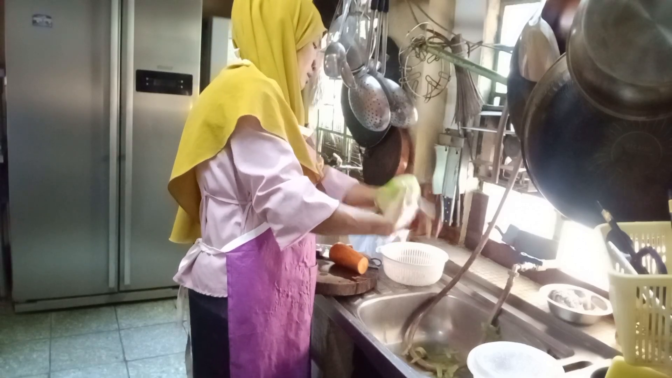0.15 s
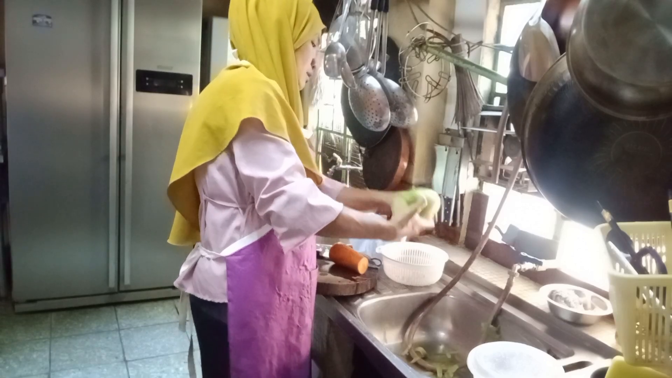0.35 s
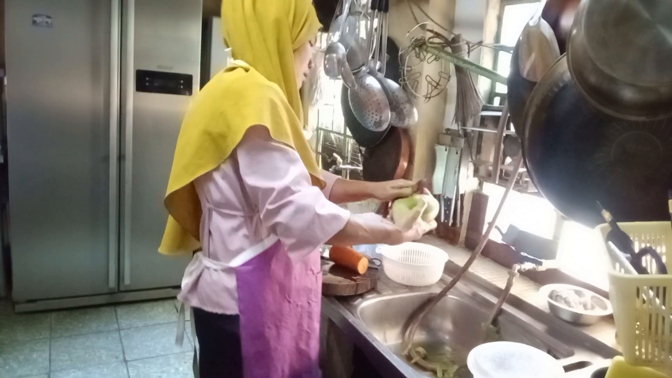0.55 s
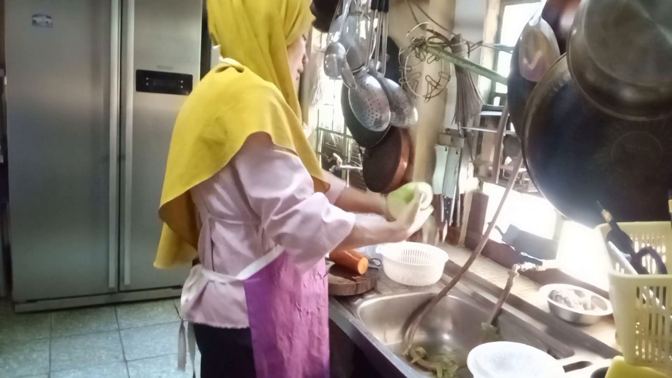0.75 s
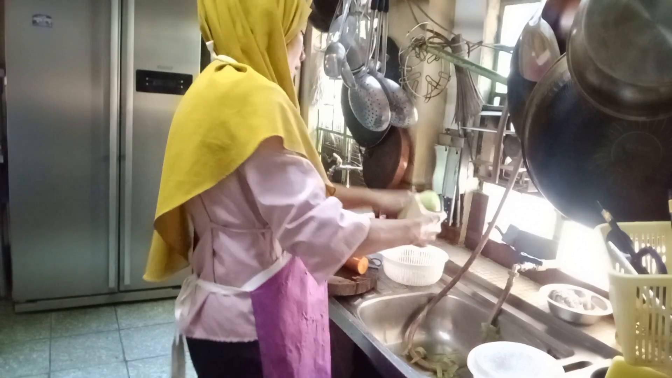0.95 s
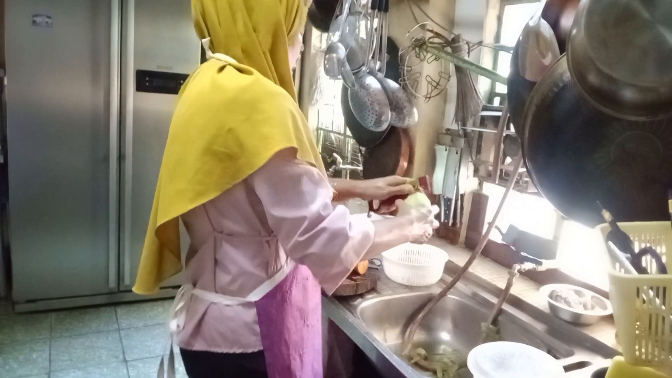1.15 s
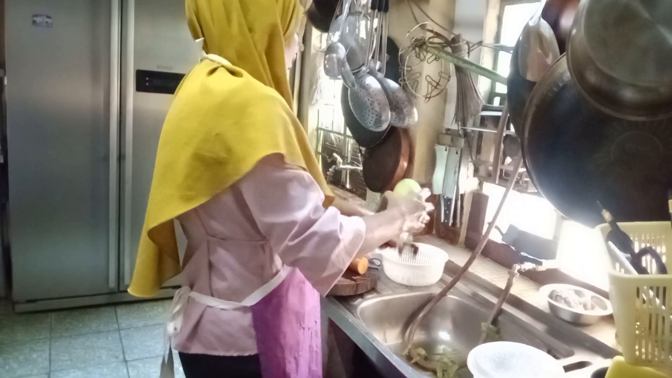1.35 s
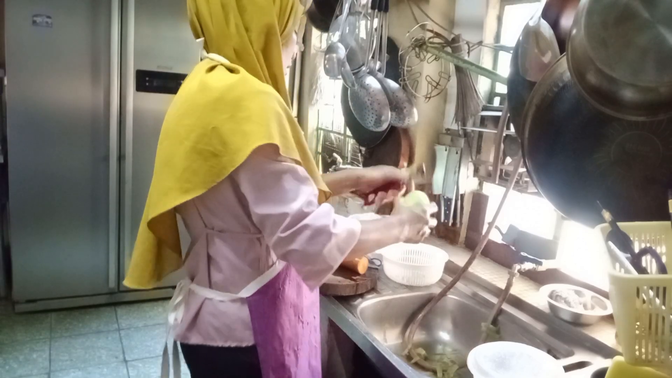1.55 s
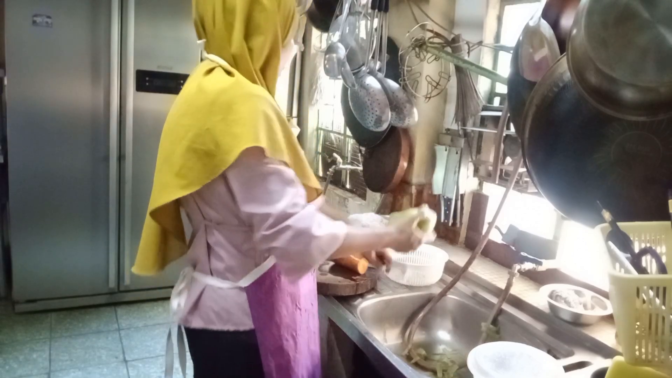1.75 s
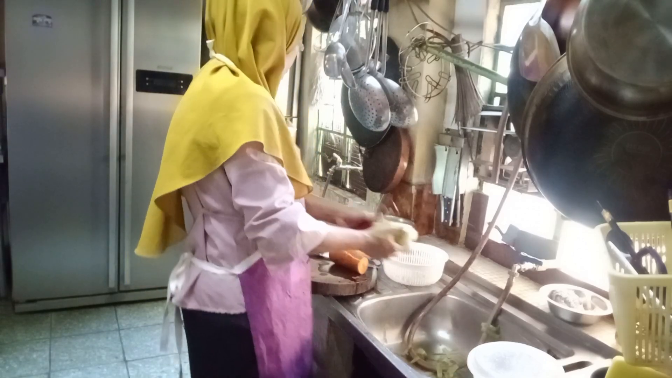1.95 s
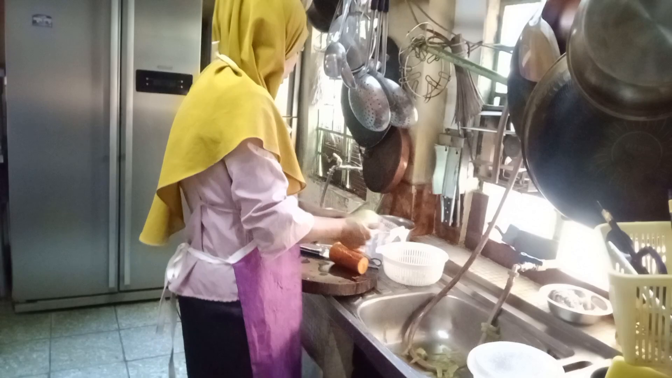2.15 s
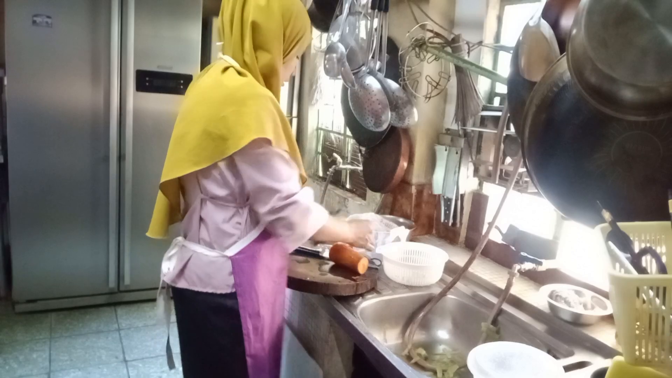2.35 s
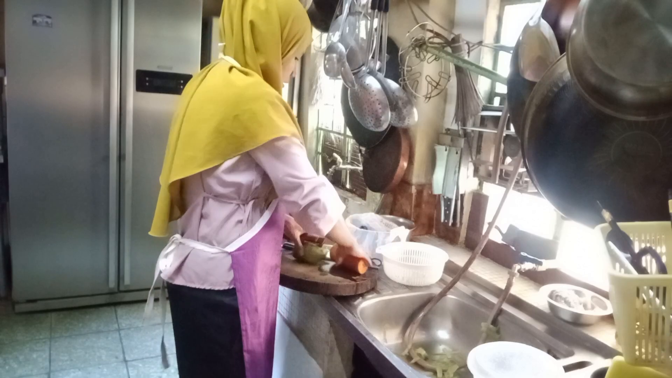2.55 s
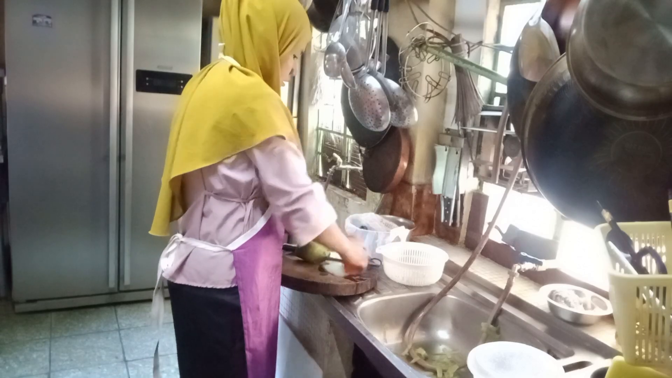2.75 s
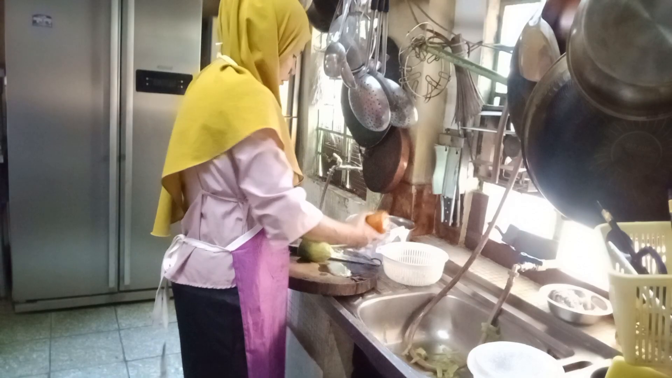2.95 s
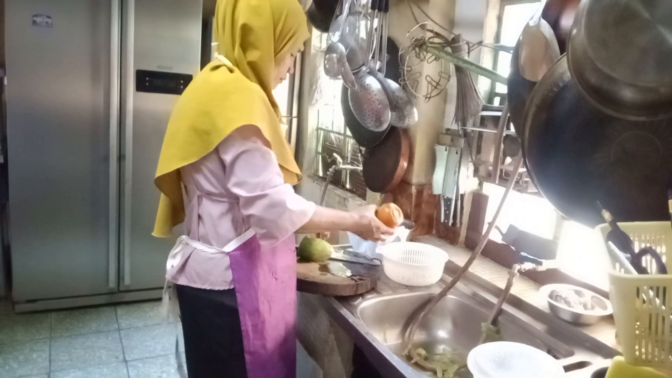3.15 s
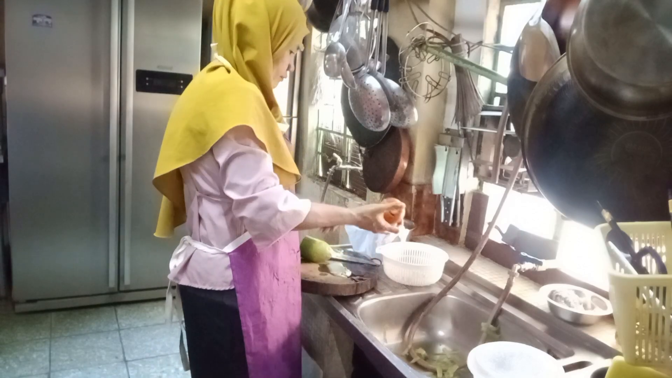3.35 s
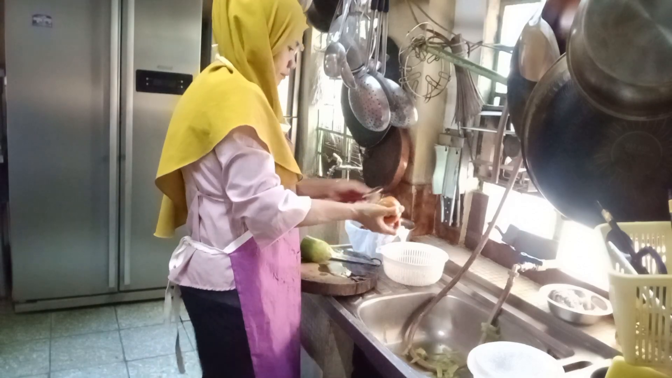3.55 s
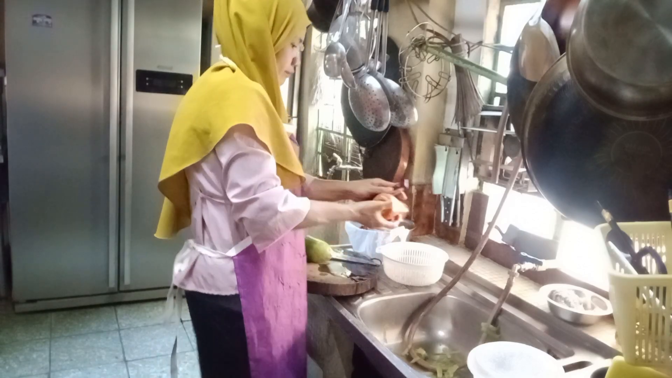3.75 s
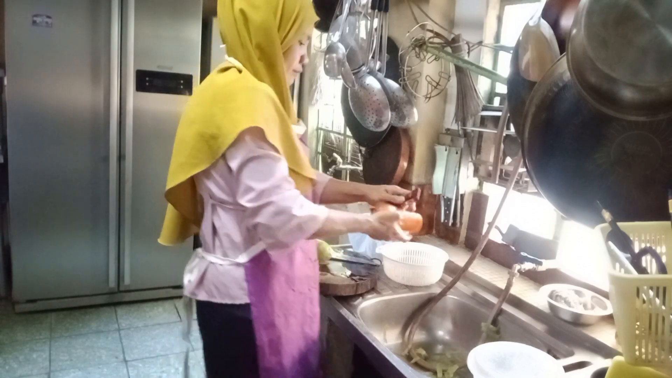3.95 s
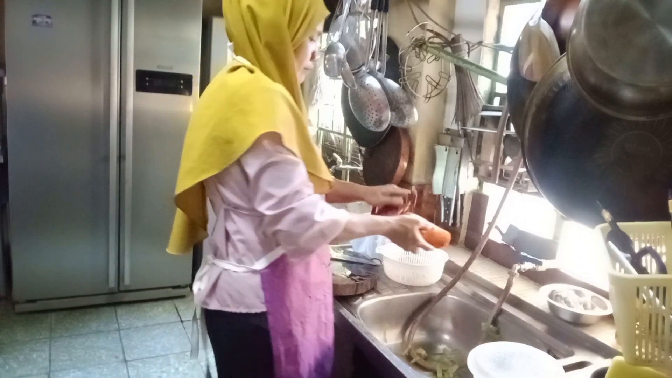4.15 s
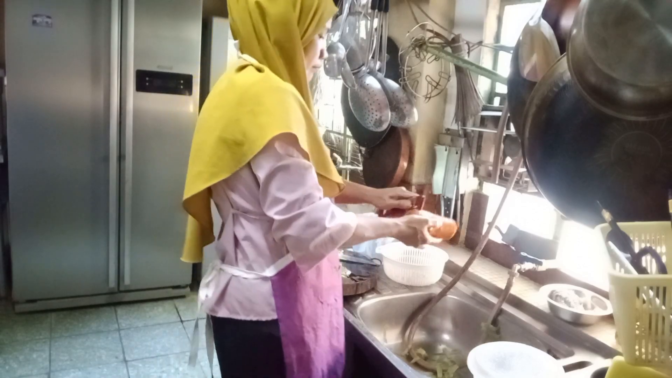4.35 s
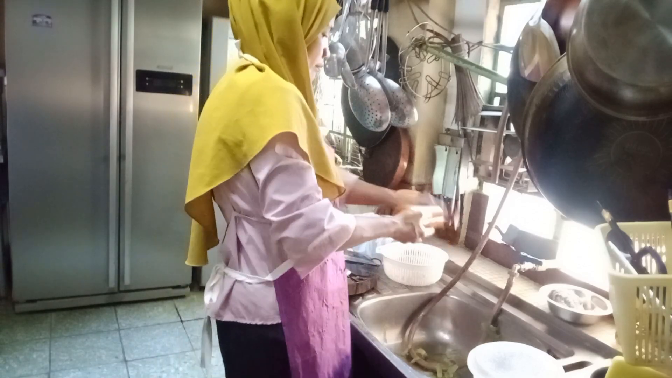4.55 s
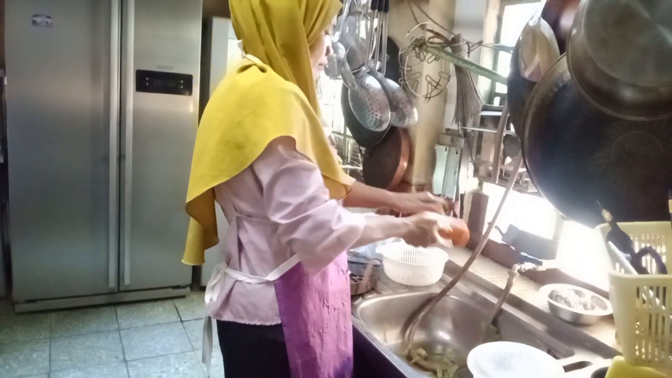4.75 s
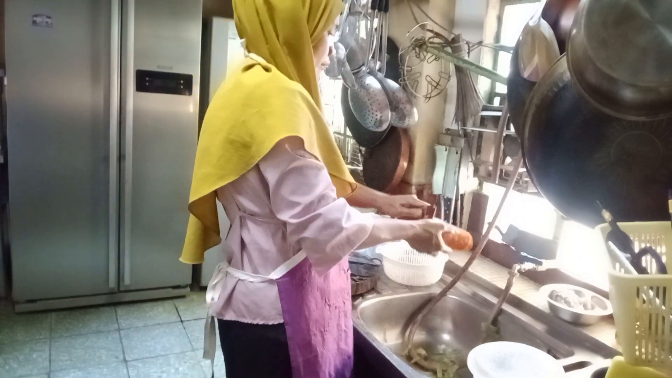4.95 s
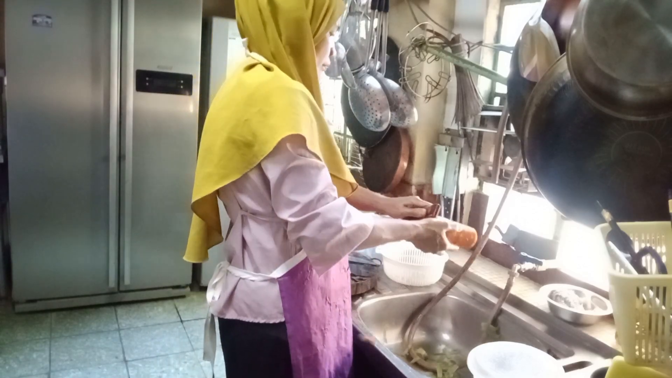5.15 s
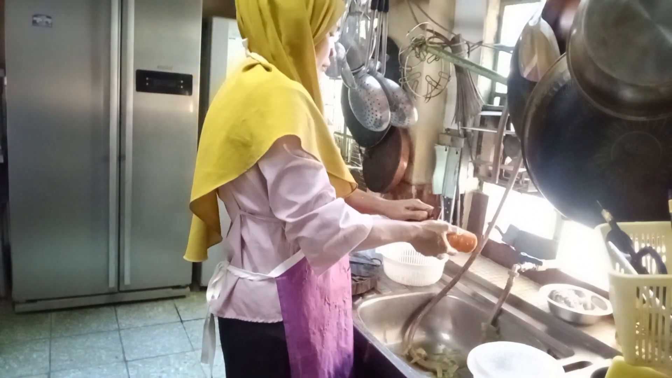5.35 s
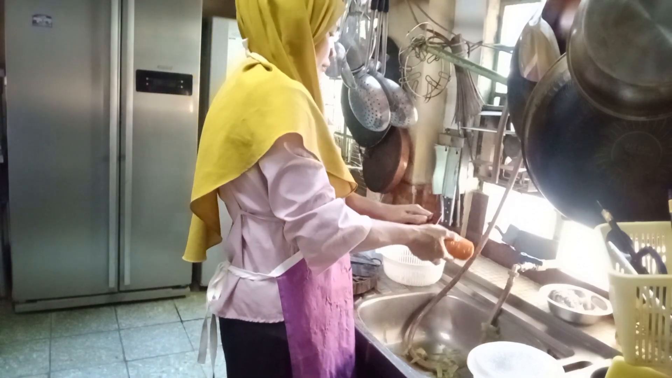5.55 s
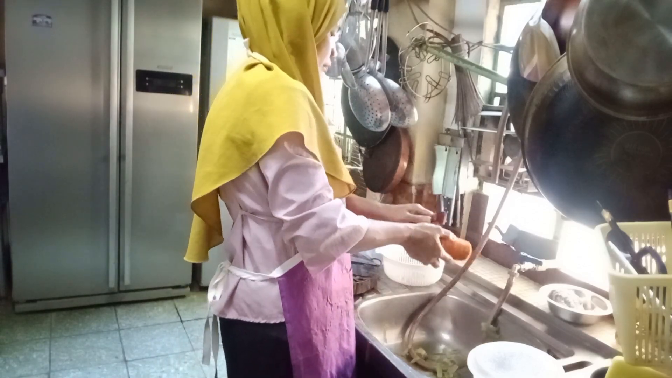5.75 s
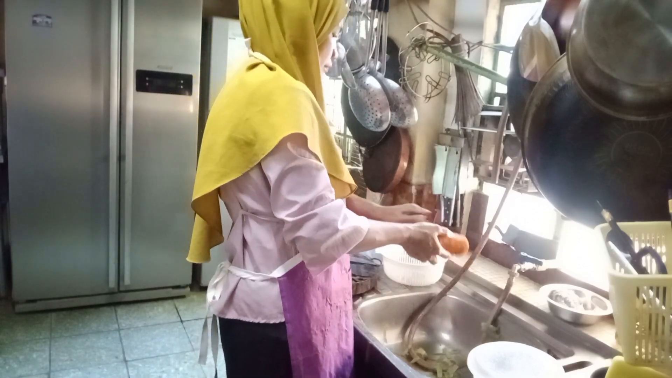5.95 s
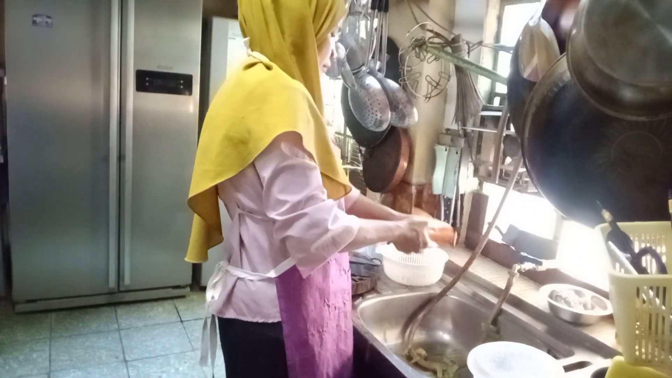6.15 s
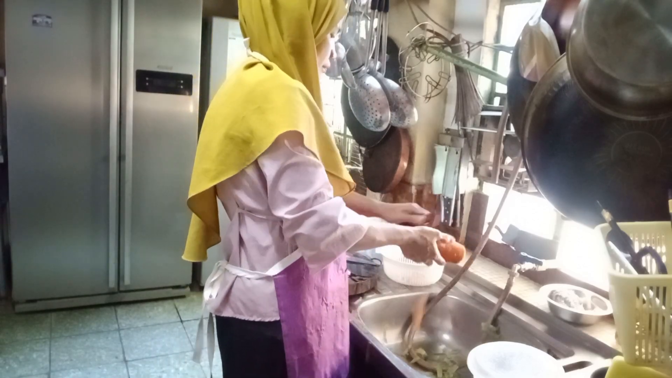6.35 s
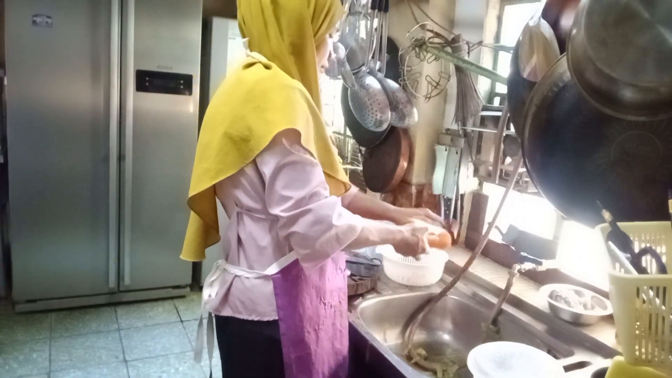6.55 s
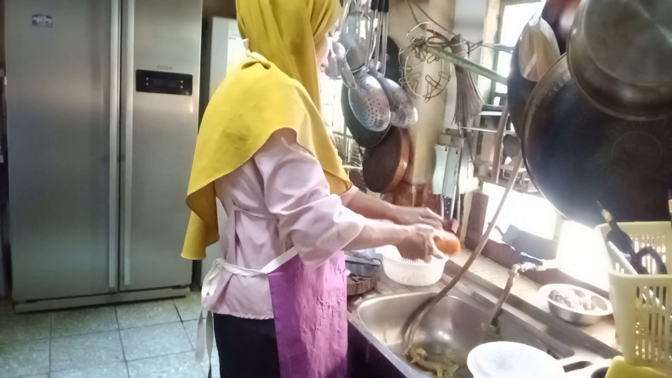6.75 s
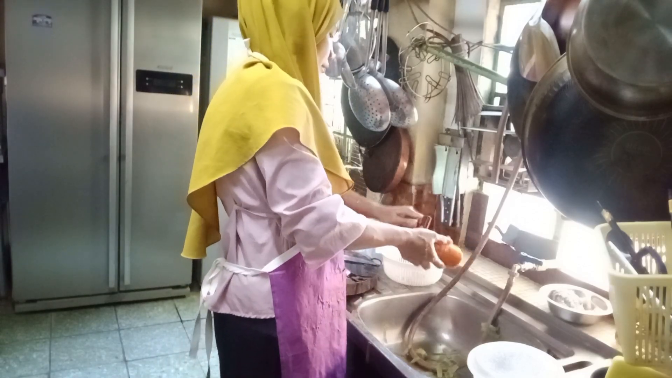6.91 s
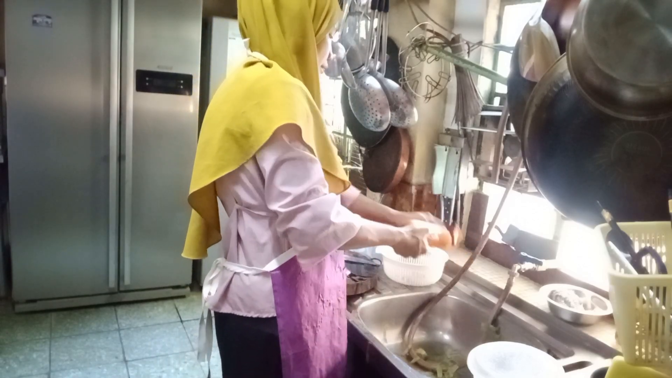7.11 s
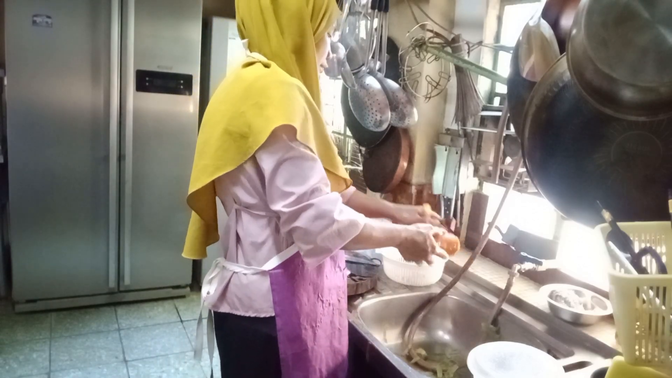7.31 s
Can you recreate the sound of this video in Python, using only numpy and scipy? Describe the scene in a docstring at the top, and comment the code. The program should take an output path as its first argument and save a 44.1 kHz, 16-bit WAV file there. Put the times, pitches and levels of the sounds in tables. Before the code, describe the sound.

A small tiled kitchen, close microphone, short reflections, with low uneven rumble, dull bumps and thin flickering hiss beneath. Gourd peeling comes in short scrapes, each a crisp bite followed by a fibrous slide with a hollow midrange colour: around 0.2-0.3 s, 0.7-0.9, 1.3-1.4, then 1.8-2.0. A tight flurry at 2.1-2.4 s includes the brightest, sharpest rasp near 2.25. At 2.7 s the gourd hits a wooden board: a dull soft push, then a rapid cluster of loud woody knocks and counter clatter, rocking out by about 2.9. From 3 to 4.2 s sleeves rustle faintly over a swelling rumble. Carrot strokes, grainier and crisp, begin lightly at 3.7 and 3.9, then come near 4.4, 4.6-4.75, 5.1, 5.85, 6.0-6.2 in a quick run, a longer one at 6.5-6.7, and 7.1-7.35. Barely audible soft rings mark peelings dropping into the steel sink.

```python
"""In a small tiled kitchen, someone peels a green gourd, drops it on a wooden board and peels a carrot.
Each stroke is a rush of tiny snaps, a bite and then a slide, filtered by the blade and the hollow of the hand.
The drop sums decaying board modes with a filtered noise clatter; peelings ring a steel sink as single sines.
Diffuse reflections follow the strokes, clatter and sleeves, over noise bands: a low rumble with dull bumps
and a faint hiss. A noise suppressor shortens the tails and makes the hiss flicker."""
import sys
import numpy as np
from scipy import signal
from scipy.fft import rfft, irfft
from scipy.io import wavfile
from scipy.ndimage import uniform_filter1d

SR = 44100
rng = np.random.default_rng(int(sys.argv[2]) if len(sys.argv) > 2 else 0)


def wav_record(signal):
    """Record a signal, one row per channel, as 16-bit PCM in the file named by sys.argv[1]."""
    frames = np.transpose(np.atleast_2d(signal))
    bounded = np.clip(frames, -1, 1)
    # unit amplitude maps onto the largest positive 16-bit level
    quanta = np.round(bounded * 32767).astype(np.int16)
    wavfile.write(sys.argv[1], SR, quanta)


N = 325458
TAPS = 4096  # length of a filter response in samples
HZ = np.fft.rfftfreq(TAPS, 1 / SR)

# Peeler strokes on the gourd; bite and slide levels are relative:
# start_s, length_s, bite_db, slide_db, hollow_start_hz, hollow_end_hz, hollow_lift_db, strip_hz, strip_lift_db
GOURD_STROKES = [ (0.166, 0.17, -31.5, -48, 1080, 1030, 15.5, 1630, 10.5),
                 (0.271, 0.037, -40.5, -32, 1150, 1150, 11.5, 3400, 1),
                 (0.702, 0.14, -31, -40, 900, 1350, 12.5, 1260, 15),
                 (0.853, 0.045, -35, -32, 1360, 1350, 1, 2910, 9.5),
                 (1.040, 0.023, -61, -65.5, 3180, 3200, 10, 4840, 8),
                 (1.282, 0.077, -35.5, -51, 1030, 1030, -2, 7100, 13),
                 (1.361, 0.082, -31, -34.5, 1094, 1034, 15, 4800, 5),
                 (1.808, .14, -45, -53, 1710, 2074, 21.5, 1710, 9),
                 (1.950, 0.043, -50, -29, 1940, 2020, 16, 2645, 18.5),
                 (2.140, 0.079, -37.5, -51.5, 1740, 1740, 18, 7000, 3),
                 (2.204, 0.064, -30, -32.5, 1750, 1780, 18, 1870, 12),
                 (2.246, .043, -29.5, -19.5, 1750, 1720, 9.5, 2065, 30.5),
                 (2.280, 0.071, -31, -40, 860, 670, -2.5, 1970, 15),
                 (2.350, 0.092, -54, -60.5, 5440, 5430, 1, 10300, 8.5)]
# Colour of the blade on gourd skin, relative: frequency_hz, level_db_per_hz
GOURD_SKIN = [(500, -2), (1000, -11), (1600, -8.5), (2050, -15.5), (2500, -8.5), (3100, 1), (4300, -5.5),
              (5200, -2.5), (7200, -9), (8800, -16.5), (10000, -9), (12000, -21.5), (15500, -26.5)]


def peel_gourd():
    """Fracture noise: gourd fibres snap one by one under the blade."""
    snaps = fibres(snaps_per_s=2000, spread_db=1.5, rub=0.38)
    return peel(GOURD_STROKES, GOURD_SKIN, snaps, direct_db=0.5, size_factor=0.84, level_db=2)


# Peeler strokes on the carrot; bite and slide levels are relative:
# start_s, length_s, bite_db, slide_db, hollow_start_hz, hollow_end_hz, hollow_lift_db, strip_hz, strip_lift_db
CARROT_STROKES = [ (3.706, 0.04, -51, -42.5, 2440, 2430, 6.2, 4770, 3),
                  (3.905, 0.091, -31, -42.5, 1730, 1740, 17, 3360, 13),
                  (4.380, .10, -43.5, -42.5, 1043, 1217, 6, 10670, 7.2),
                  (4.398, .034, -34.5, -38.5, 1080, 1071, 19, 1140, 4),
                  (4.604, .14, -43.5, -35.5, 2380, 1400, 9.9, 3360, 2.2),
                  (4.742, 0.027, -36, -38.5, 1270, 1140, 9.7, 2710, 1),
                  (5.012, 0.019, -51.5, -57.5, 2000, 1970, 10.5, 6940, 5.7),
                  (5.119, 0.049, -36, -33.5, 1268, 1300, 6.5, 2800, 6.7),
                  (5.840, 0.08, -36.5, -44, 1603, 1044, 1.92, 2430, 4.97),
                  (6.021, .07, -32, -41, 2270, 1740, 18, 9600, 4.9),
                  (6.098, .075, -34.5, -31.5, 2000, 1404, 2, 2260, 5),
                  (6.180, .05, -31, -34.5, 1400, 1265, 0.89, 5070, 3.5),
                  (6.522, .20, -31.5, -41, 2114, 1066, 6, 2450, 8.1),
                  (6.727, .034, -36.5, -39.5, 1493, 1480, 2.5, 2537, 2),
                  (7.098, 0.099, -34.5, -51, 1170, 1410, 8.8, 2900, 10.2),
                  (7.186, 0.109, -40.5, -36, 2590, 1740, 5, 2356, 4.6),
                  (7.310, 0.064, -39.5, -43.5, 1110, 980, 2, 2900, 1.5)]
# Colour of the blade on carrot skin, relative: frequency_hz, level_db_per_hz
CARROT_SKIN = [(500, -4), (1000, -6), (1900, -11), (2500, -1.5), (3500, -3.5), (4300, -8.5), (5400, -4.5),
               (7200, -13), (8800, -18.5), (9900, -10.5), (12000, -27.5), (15500, -28)]


def peel_carrot():
    """Fracture noise: carrot snaps come faster and vary more in size than those of the gourd."""
    snaps = fibres(snaps_per_s=2400, spread_db=5.0, rub=0.39)
    return peel(CARROT_STROKES, CARROT_SKIN, snaps, direct_db=-2.0, size_factor=0.82, level_db=1.5)


# Resonances of the peeler: frequency_hz, width_hz, lift_db
PEELER = [(2463, 310, 5), (2872, 1200, 2), (3647, 190, 7.5), (6980, 420, 3)]
BITE_TILT_DB, SLIDE_TILT_DB = -0.08, -2.77  # per octave: the bite is brighter than the slide
DRAG_DB, DRAG_HZ = 0.7, 26.4  # the sliding blade catches and frees itself: how much and how fast


def peel(strokes, skin, snaps, direct_db, size_factor, level_db, strip_q=13, count=4):
    """Source-filter principle: snaps excite blade, strip and hollow, whose resonance glides in the slide."""
    out = np.zeros(N)
    drag = amp(DRAG_DB * waver(DRAG_HZ))
    blade = read(skin, HZ) + sum(db * bump(hz, width) for hz, width, db in PEELER)
    octaves = np.log2((HZ + 500) / 3000)
    rooms = [kitchen(np.ones(1), direct_db, size_factor) for _ in range(count)]
    for s, length, bite_db, slide_db, start_hz, end_hz, lift_db, strip_hz, strip_db in strokes:
        t = np.arange(0, length, 1 / SR)
        now = (round(s * SR) + np.arange(len(t))) % N
        bite, slide = effort(t, length)
        tone = blade + strip_db * bump(strip_hz, strip_hz / strip_q)

        biting = amp(bite_db) * bite * snaps[-now]  # snaps independent of those in the slide
        bite_tone = tone + hollow(start_hz, lift_db) + BITE_TILT_DB * octaves
        scrape = signal.fftconvolve(biting, colour(bite_tone))

        sliding = amp(slide_db) * slide * drag[now] * snaps[now]
        for k, hz in enumerate(np.geomspace(start_hz, end_hz, count)):
            share = np.maximum(1 - abs((count - 1) * t / length - k), 0)  # one colour fades into the next
            slide_tone = tone + hollow(hz, lift_db) + SLIDE_TILT_DB * octaves
            scrape += signal.fftconvolve(share * sliding, colour(slide_tone))
        add(out, s, amp(level_db) * travelling(nearby(scrape, reach_s=.003), rooms))
    return out


# The edge digs in, holds until BITE_HOLD_S after the start, and breaks through the skin
BITE_RISE_S, BITE_HOLD_S, BITE_FALL_S = 0.0051, 0.019, .012
# Then it runs under the skin, easing off, and leaves it
SLIDE_RISE_S, SLIDE_FADE_DB_PER_S, RELEASE_S = 0.04, 22, .007


def effort(t, length):
    """Force envelopes: a brief indentation for the bite, a slowly easing shear for the slide."""
    bite = np.minimum(t / BITE_RISE_S, 1) ** 2 * np.exp(-np.maximum(t - BITE_HOLD_S, 0) / BITE_FALL_S)
    slide = np.minimum(t / SLIDE_RISE_S, 1) * amp(-SLIDE_FADE_DB_PER_S * t)
    return np.array([bite, slide]) * np.minimum((length - t) / RELEASE_S, 1)


TEAR_DB, TEAR_HZ = 0.5, 201  # the fibres tear in clumps: how much and how fast


def fibres(snaps_per_s, spread_db, rub):
    """Random impulse process: snaps of uneven size, in clumps, over the plain rub of the blade."""
    sizes = amp(spread_db * np.minimum(rng.exponential(1, N), 3)) * rng.choice([-1, 1], N)
    snaps = evened(sizes * (rng.random(N) < snaps_per_s / SR))
    rubbing = rub * rng.standard_normal(N)
    return evened((snaps + rubbing) * amp(TEAR_DB * waver(TEAR_HZ)))


def hollow(hz, lift_db, q=11.0, cut_ratio=0.85, leak_db=-19):
    """Cavity resonance: the hollow of the hand lifts one band and sheds what lies below (dB)."""
    passed = 1 / (1 + (cut_ratio * hz / (HZ + 1)) ** 8)
    leak = amp(leak_db) * HZ / (HZ + 300)
    return 20 * np.log10(passed + leak + 1e-4) + lift_db * bump(hz, hz / q)


def travelling(x, rooms, step_s=.006):
    """Moving source: successive moments of a stroke meet different reflections as the blade moves."""
    steps, count = np.arange(len(x)) / (step_s * SR), len(rooms)
    shares = [np.maximum(1 - abs((steps - k) % count - 1), 0) for k in range(count)]
    return sum(signal.fftconvolve(share * x, room) for share, room in zip(shares, rooms))


# The gourd lands, rocks and shakes the counter: start_s, ring_db, clatter_db, brightness_db_per_octave
BLOWS = [(2.715, -39, -35.5, 11), (2.73, -24.5, -21.5, 1.5), (2.744, -24, -22.5, -4.5),
         (2.762, -18.5, -22, -0.5), (2.778, -33.5, -29, 1), (2.796, -32, -24.5, -1.5),
         (2.833, -26.5, -39.5, 1.5), (2.852, -41, -36, -0.5), (2.87, -31, -43.5, -2.5)]
# Modes of board and counter; ring_factor scales the decay: frequency_hz, level_db, t60_s
BOARD = [(62.06, -14, .75), (105.45, -11, 0.58), (180.1, -1.5, .42), (208.7, -4, 0.29), (280, -4, 0.37),
         (396.3, -19, .25), (479.5, -15.5, .34), (509, -8.5, 0.24), (547, -9, .3), (592, -18, 0.7),
         (627, -13, 0.58), (661, -9, .2), (829, -14.5, .25), (974, -13.5, .28), (1126.5, -8, .32),
         (1113.4, -8, 0.25), (1128, -17, 0.22), (1323, -16, .2), (1509, -19, .26), (1845, -15, .2),
         (2048, -17, .2)]
# Colour of the things that clatter on the counter, relative: frequency_hz, level_db_per_hz
CLATTER = [(35, -29.5), (60, -13.5), (130, -11.5), (230, -6.5), (330, -10.5), (450, -11), (640, -5),
           (780, -12), (1080, -6), (2300, -18.5), (3700, -17), (4600, -23.5), (7000, -32), (10000, -41.5),
           (15500, -60)]


def thump(contact_s=0.0026, swell_s=0.0053, ring_factor=0.75):
    """Modal vibration: each blow rings the modes of the board and makes things on the counter clatter."""
    out, t = np.zeros(N), np.arange(SR) / SR
    hz, mode_db, t60 = np.transpose(BOARD)[:, :, None]
    sign = (-1) ** np.arange(len(BOARD))[:, None]  # neighbouring modes swing in opposite directions
    for s, ring_db, clatter_db, bright in BLOWS:
        decay = amp(mode_db + bright * np.log2(hz / 600) - 60 * t / (t60 * ring_factor))
        modes = (sign * decay * np.sin(2 * np.pi * hz * t)).sum(0)
        add(out, s, amp(ring_db) * modes * (1 - np.exp(-t / swell_s)))

        crush = rng.standard_normal(TAPS) * np.exp(-t[:TAPS] / contact_s)
        tone = colour(read(CLATTER, HZ) + bright * np.log2((HZ + 100) / 600))
        clatter = kitchen(nearby(signal.fftconvolve(crush, tone)), direct_db=-6, size_factor=0.7)
        add(out, s, amp(clatter_db) * clatter / np.std(clatter[:SR // 20]))
    return out + push()


def push(s=2.7105, hz=112, length=0.022, db=-14):
    """Soft impact: the flesh meets the board first and bends it for a few slow cycles."""
    t, out = np.arange(0, length, 1 / SR), np.zeros(N)
    add(out, s, amp(db) * np.sin(2 * np.pi * hz * t) * np.sin(np.pi * t / length))
    return out


# Peelings drop into the steel sink; levels are relative: start_s, level_db, pitch_hz
PEELINGS = [(0.855, -61, 604), (2.275, -53, 825), (2.96, -61, 610), (3.11, -64.5, 583), (3.966, -58.5, 625),
            (4.771, -52.5, 215)]


def peelings(t60=.3, soft_s=0.0042):
    """Damped oscillation: wet strips land softly and set the sink ringing."""
    out, t = np.zeros(N), np.arange(SR // 2) / SR
    for s, db, hz in PEELINGS:
        ring = np.sin(2 * np.pi * hz * t) * amp(-60 * t / t60) * (1 - np.exp(-t / soft_s))
        ripple = evened(uniform_filter1d(rng.standard_normal(len(t)), size=300))  # uneven level
        add(out, s, amp(db + 10) * ring * (1 + 0.48 * ripple))
    return out


# Sleeves brush as the arms move, level before the folds: start_s, level_db
SLEEVES = [(0, -75), (3.051, -77), (3.252, -63.5), (3.439, -63.5), (3.56, -88), (3.881, -66), (4.0, -61.5),
           (4.14, -65.5), (4.24, -84), (7.38, -87.5)]
# Colour of the cloth, relative: frequency_hz, level_db_per_hz
CLOTH = [(150, -4.5), (600, 1), (1400, 2.5), (2000, 0.5), (3000, -2), (5000, -4), (6400, -5), (8800, -8),
         (10000, -1.5), (11500, -25), (15500, -36.5)]


def sleeves(folds_db=4.0):
    """Friction noise: cloth slides and catches, fold by fold."""
    folds = noise([(0, 0), (25, 0), (70, -100)])  # slow drift, mostly under 25 Hz
    level_db = np.interp(np.arange(N) / SR, *np.transpose(SLEEVES))
    rub = noise(CLOTH) * amp(level_db + folds_db * folds)
    return kitchen(nearby(nearby(rub)), direct_db=-6.5, size_factor=.8)[:N]


# Level of the low rumble before its swell: start_s, below_90_hz_db, above_90_hz_db
RUMBLE_LEVEL = [(0, -56.5, -57), (1.1, -56.5, -64), (2.0, -51.5, -55), (2.4, -63, -61), (3.15, -46.5, -50),
                (3.55, -68, -59.5), (3.75, -48, -50), (4.35, -51, -56.5), (4.85, -69.5, -63.5),
                (6.95, -71, -62), (7.25, -41, -44.5)]
# Dull bumps rise out of it: centre_s, below_90_hz_db, above_90_hz_db
BUMPS = [(0.2, -69, -50), (0.44, -46, -70), (0.88, -52, -55), (1.5, -67, -53.5), (2.11, -43, -63),
         (3.47, -78.5, -46), (3.85, -45.5, -50), (4.06, -49, -51), (5.25, -62, -62), (5.68, -53, -54.5),
         (6.099, -53.5, -57.5), (6.33, -53.5, -55), (6.85, -53, -51.5)]
# Colour of the deep band, relative: frequency_hz, level_db_per_hz
RUMBLE_DEEP = [(25, -17), (45, -9), (56, -0.5), (64, 9), (75, -5.5), (90, -9), (130, -35.5), (400, -110)]
# Colour of the band above it, relative: frequency_hz, level_db_per_hz
RUMBLE_BODY = [(30, -60.5), (70, -25.5), (100, -2), (126, 7.5), (165, -14), (205, -2.5), (260, -38.5),
               (400, -35.5), (900, -53), (3000, -110)]
BUMP_S = .05  # each bump swells and sinks in about this time
SWELL_DB, SWELL_HZ = 3.5, 6  # the rumble wavers at random: how much and how fast


def rumble():
    """Amplitude-modulated band noise: a slowly changing low rumble with dull bumps, in two bands."""
    t = np.arange(0, N / SR + .01, .005)
    s, *levels = np.transpose(RUMBLE_LEVEL)
    gains = amp([np.interp(t, s, db) for db in levels])
    for at, *bump_db in BUMPS:
        swell = amp(bump_db)[:, None] * np.exp(-((t - at) / BUMP_S) ** 2)
        gains = np.hypot(gains, swell)  # powers add
    bands = [np.interp(np.arange(N) / SR, t, gain) * noise(band)
             for gain, band in zip(gains, (RUMBLE_DEEP, RUMBLE_BODY))]
    return sum(bands) * amp(SWELL_DB * waver(SWELL_HZ))


# Colour of the steady hiss, relative: frequency_hz, level_db_per_hz
HISS = [(59, -44), (100, -12.5), (129, -12.5), (275, -14), (335, -21.5), (448, -22), (1710, -29.5),
        (2010, -25), (2580, -32), (7500, -44), (9750, -76), (16500, -120)]
# Colour of the thin treble hiss, relative: frequency_hz, level_db_per_hz
TREBLE_HISS = [(6500, -39), (7600, -6), (8450, 3), (8800, -13), (9150, -22.5), (9900, -12), (11000, -28.5),
               (15500, -35.5)]


def background(hiss_db=-60.5, treble_db=-72):
    """Incoherent superposition: low rumble, steady hiss and a thin treble hiss."""
    return rumble() + amp(hiss_db) * noise(HISS) + amp(treble_db) * noise(TREBLE_HISS)


# Reverberation of the tiled room; size_factor scales it: frequency_hz, t60_s
ROOM = [(100, 0.2), (400, 0.4), (1200, 0.26), (3200, 0.28), (6000, 0.26), (10000, 0.16), (15000, 0.067)]


def kitchen(x, direct_db, size_factor):
    """Diffuse reverberation: direct sound, then random dense reflections, each band decaying on its own."""
    hz, t, z = signal.stft(rng.standard_normal(SR // 2), SR, nperseg=256)
    decay = amp(-60 * t / (size_factor * read(ROOM, hz))[:, None])
    tail = signal.istft(z * decay, SR, nperseg=256)[1]
    gap = np.zeros(SR // 700)  # before the first reflection
    response = np.concatenate([[amp(direct_db)], gap, tail / np.linalg.norm(tail)])
    return signal.fftconvolve(x, response / np.linalg.norm(response))


def nearby(x, count=6, reach_s=.006):
    """Comb filtering: the sink, wall and pans close by return early echoes."""
    taps = np.zeros(SR // 50)
    taps[0] = 1
    at = 8 + (rng.random(count) * min(reach_s, .018) * SR).astype(int)
    taps[at] = .22 * rng.choice([-1, 1], count)
    return signal.fftconvolve(x, taps / np.linalg.norm(taps))


def amp(db):
    """Logarithmic level: decibels to gain."""
    return 10 ** (np.asarray(db) / 20)


def evened(x):
    """Normalisation: scales to rms 1."""
    return x / np.sqrt(np.mean(x ** 2) + 1e-20)


def read(points, hz):
    """Interpolation: reads a spectrum on a log-frequency axis."""
    f, value = np.transpose(points)
    return np.interp(np.log(hz + 1), np.log(f + 1), value)


def add(mix, s, sound):
    """Superposition: mixes a sound in at time s."""
    part = mix[max(round(s * SR), 0):][:len(sound)]
    part += sound[:len(part)]


def bump(hz, width):
    """Resonance: bell-shaped curve of height 1, width in Hz at half height."""
    return 1 / (1 + (2 * (HZ - hz) / width) ** 2)


def colour(db):
    """Minimum phase: causal impulse response of energy 1 with the given spectrum."""
    log_gain = np.log(amp(np.maximum(db, db.max() - 100)))
    circle = np.concatenate([log_gain, log_gain[-2:0:-1]])
    response = np.fft.ifft(np.exp(np.conj(signal.hilbert(circle)))).real
    return response / np.linalg.norm(response)


def noise(spectrum):
    """Spectral shaping: steady noise of rms 1 with the given spectrum."""
    gain = amp(read(spectrum, np.fft.rfftfreq(N, 1 / SR)))
    return evened(irfft(rfft(rng.standard_normal(N)) * gain, N))


def waver(hz):
    """Low-pass noise: random drift of rms 1, up to about the given rate."""
    return evened(signal.sosfilt(signal.butter(2, hz, fs=SR, output="sos"), rng.standard_normal(N)))


def suppress(x, threshold_db=0.0, depth_db=-11):
    """Spectral gating: each band is turned down near its own quiet level; tails end early, hiss flickers."""
    z = signal.stft(x, SR, nperseg=512, noverlap=384)[2]
    power = uniform_filter1d(abs(z) ** 2, size=4, axis=-1) + 1e-24
    quiet = np.percentile(power, 15, axis=-1, keepdims=True)
    gain = np.maximum(power / (power + quiet * amp(threshold_db) ** 2), amp(depth_db))
    return signal.istft(z * gain, SR, nperseg=512, noverlap=384)[1][:, :N]


def scene():
    """Superposition: gourd, thump, carrot, and the small sounds around them."""
    return (peel_gourd() + thump() + peel_carrot() + peelings() + sleeves() + background())[None]


def record(dry, edge_hz=15650):
    """Band limiting: steady noise is suppressed, then a low-pass removes the highest treble."""
    low_pass = signal.firwin(511, edge_hz, window=("kaiser", 9), fs=SR)
    return signal.oaconvolve(suppress(dry), low_pass[None], "same")


dry = scene()
out = record(dry)
wav_record(out)
```